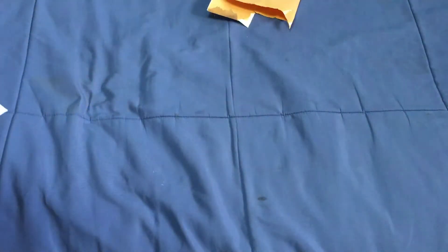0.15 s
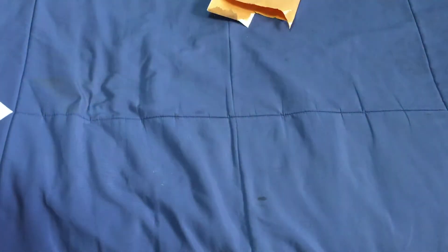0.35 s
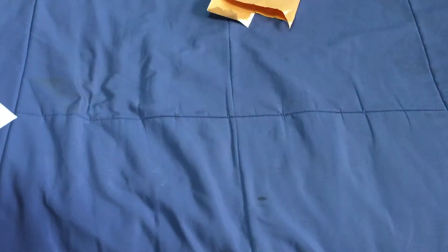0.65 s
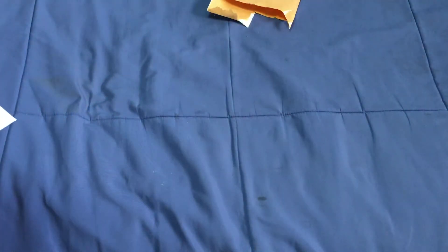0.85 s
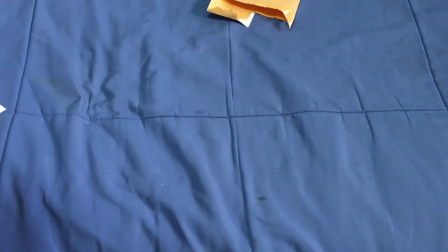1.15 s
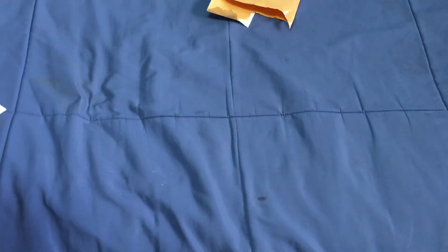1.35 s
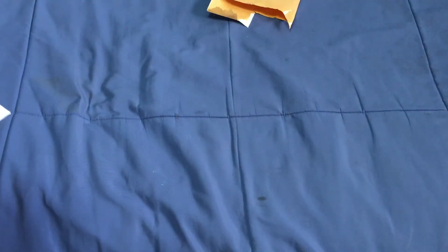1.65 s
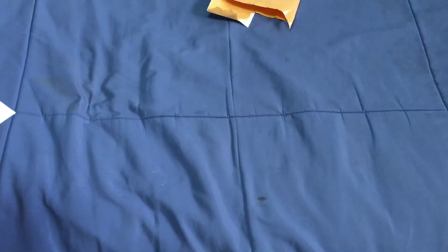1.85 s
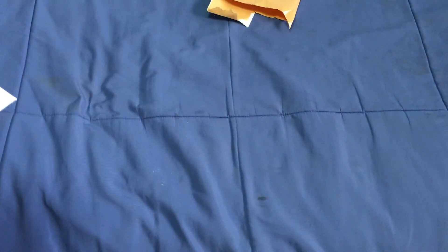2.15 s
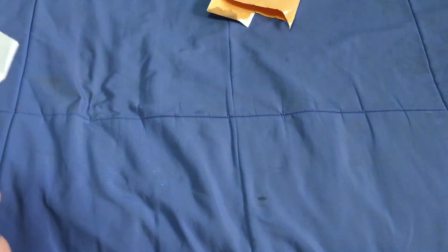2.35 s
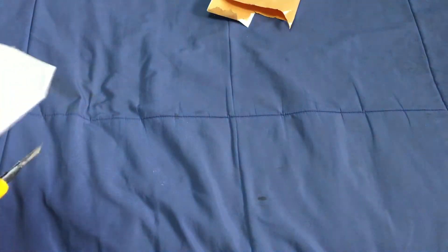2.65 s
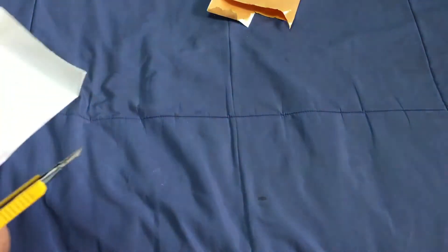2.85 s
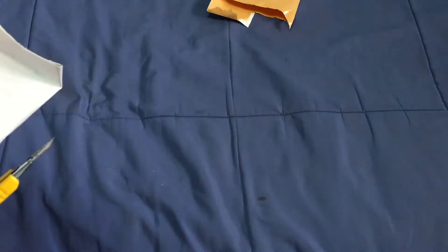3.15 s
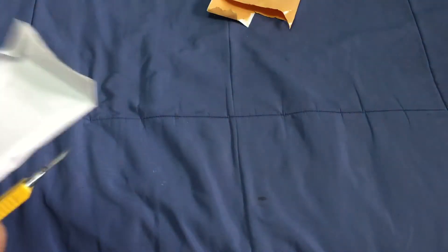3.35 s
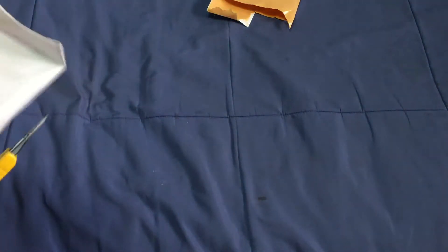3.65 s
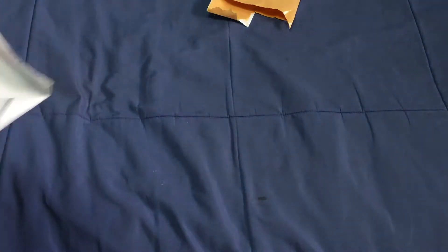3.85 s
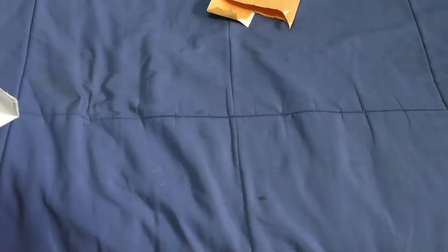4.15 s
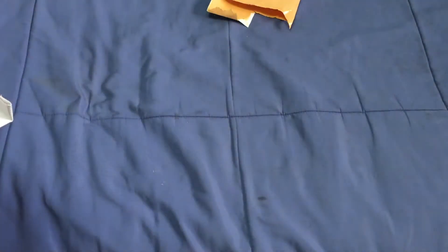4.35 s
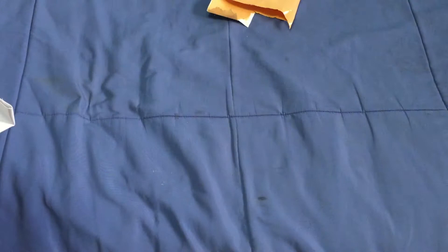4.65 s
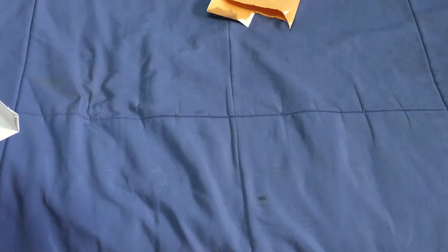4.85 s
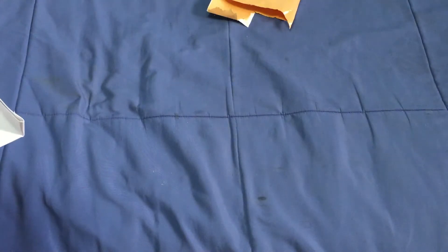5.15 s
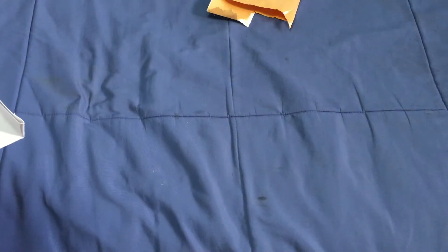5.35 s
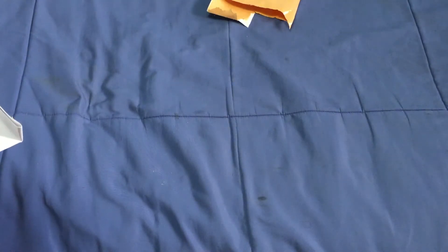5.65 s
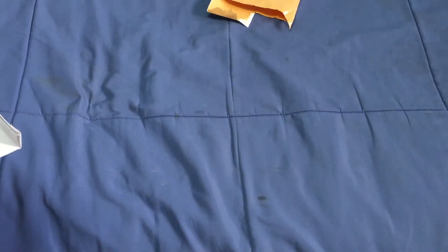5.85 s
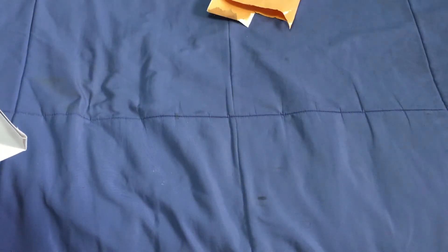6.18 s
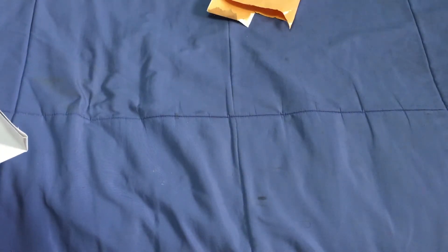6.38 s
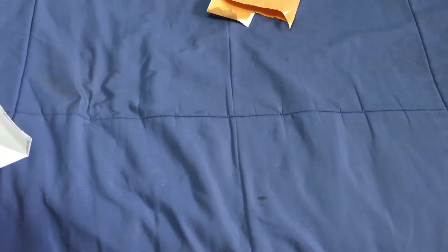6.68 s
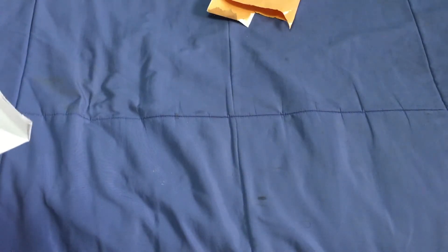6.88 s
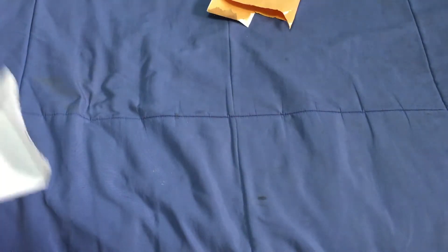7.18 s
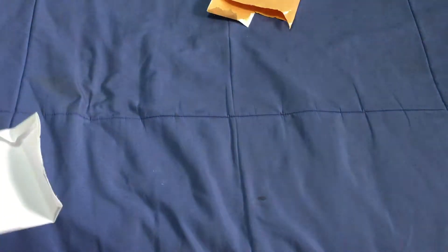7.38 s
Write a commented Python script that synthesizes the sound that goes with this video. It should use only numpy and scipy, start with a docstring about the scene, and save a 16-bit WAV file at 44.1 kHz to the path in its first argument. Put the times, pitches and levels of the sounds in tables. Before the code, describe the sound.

Stiff paper envelope handled and torn close up in a quiet room, with sharp crackling snaps, short rips and a brief pause before more crinkling.

```python
"""A small, quiet room: hands turn a stiff paper envelope close to the microphone and tear at its edge.
Strokes are filtered showers of fibre breaks over a rub; buckling creases are dispersed, scattered pulses.
The paper creaks once as a finger sticks and slips; the moving sheet pushes air in soft low thuds, swells of
filtered noise, and its panel thumps hollowly, some thumps under a loud snap.
A short decaying-noise tail and faint steady noise form the room; a microphone response colours the sum."""
import sys
import numpy as np
from scipy import signal
from scipy.fft import rfft, irfft
from scipy.io import wavfile
from scipy.ndimage import uniform_filter1d

SR = 44100
rng = np.random.default_rng(int(sys.argv[2]) if len(sys.argv) > 2 else 0)


def transcribe(u):
    """Save the signal u as a 16-bit wav file named by the first command-line argument.

    u: samples, shape (n,) or (channels, n), limited to [-1, 1]; the rate is SR.
    q: integer samples, one column per channel.
    """
    v = np.clip(np.atleast_2d(u).T, -1, 1)
    q = np.round(v * 32767).astype(np.int16)
    wavfile.write(sys.argv[1], SR, q)


N = 331496
TIME = np.arange(N) / SR  # s
HZ = np.arange(N // 2 + 1) * SR / N + 1  # offset by 1 Hz to keep logarithms finite

# Levels of all sources are those ahead of the microphone response.
# Spectrum of the quiet room: (frequency [Hz], relative spectral level [dB])
BACKGROUND_SPECTRUM = [(25, -17), (55, -1), (125, -2.5), (170, -13.5), (550, -25.5), (2400, -23),
                       (6500, -27), (15500, -33.5)]
BACKGROUND_DB = -71.2  # rms level

# Paper slides or tears:
# (time of full force [s], rise [s], fall [s], level at full force [dB],
#  lowest radiated frequency [Hz], panel resonance [Hz])
STROKES = [(0.008, 0.0084, 0.039, -60.5, 590, 1040), (1.081, 0.0045, 0.014, -36.5, 205, 1130),
           (1.11, 0.019, 0.48, -62.5, 270, 1007), (1.17, 0.019, 0.12, -57, 1160, 3900),
           (1.58, 0.18, 0.44, -57, 216, 1570), (1.658, 0.0092, .009, -35, 376, 2970),
           (1.686, 0.028, 0.081, -52, 690, 1454), (2.187, 0.0039, 0.02, -41, 329, 1130),
           (2.26, .045, 0.075, -37.5, 95.5, 1700), (2.299, 0.017, 0.011, -35, 508, 1600),
           (2.551, 0.0034, 0.0219, -33.5, 2100, 5420), (2.741, 0.016, 0.027, -38.5, 95.5, 1930),
           (2.89, 0.27, 0.16, -62, 706, 2120), (3.099, 0.036, 0.37, -65, 890, 2370),
           (3.273, 0.028, 0.057, -38.5, 643.6, 5300), (3.341, 0.059, 0.045, -37, 1100, 8090),
           (3.362, 0.0079, 0.021, -29.5, 596, 3152), (3.591, 0.0082, 0.003, -36, 754, 3520),
           (3.72, 0.017, 0.14, -57, 100, 2430), (3.825, 0.031, 0.17, -52, 1395, 2200),
           (4.046, 0.03, 0.018, -49.5, 2140, 4320), (4.181, 0.0042, 0.031, -60.5, 800, 1130),
           (4.418, 0.015, 0.052, -57, 1619, 1780), (4.451, 0.024, 0.027, -45, 1500, 5490),
           (4.728, 0.17, 0.15, -58.5, 3670, 4660), (5.361, 0.013, 0.023, -65.5, 1484, 2990),
           (5.8, 0.13, 0.27, -75.5, 1510, 2545), (6.355, 0.039, .06, -53.5, 546, 1860),
           (6.412, 0.016, 0.049, -46.5, 705, 2070), (6.499, 0.083, 0.17, -57, 120, 2440),
           (6.78, 0.12, 0.22, -60.5, 350, 2530), (6.85, 0.068, 0.032, -58, 1500, 5960),
           (7.215, 0.071, 0.094, -48.5, 564, 4400), (7.301, 0.15, 0.14, -65.5, 410, 2730),
           (7.475, 0.01, 0.011, -59.5, 101, 1760)]

# Treble slope of a stroke at the reference resonance and level, and its growth with each:
# small patches and hard strokes sound brighter
STROKE_HZ, STROKE_DB = 2000, -48
STROKE_SLOPE_DB = -1  # dB per octave
SLOPE_PER_OCTAVE, SLOPE_PER_DB = 3.1, 0.0757  # dB per octave, for each octave and each dB

# Fibre breaks per s in each sound path of a very small patch; one that rings at SPARSE_HZ has half
PATH_BREAKS_PER_S, SPARSE_HZ = 1450, 1560
RUB_SHARE = .35  # amplitude of the smooth rub against the rms of the breaks
# A tear advances in jerks, with a steady drag between them (energy against the mean of the jerks,
# for a very small patch)
JERKS_PER_S, JERK_S, JERK_SPREAD_DB, DRAG = 220, .0013, 3.7, .3
GLIDE_S = .09  # a stroke that takes longer than this to build up glides more than it jerks

# Reverberant tail: (frequency [Hz], t60 [s], level against the sound sent to the room [dB])
ROOM_BANDS = [(92, 0.25, 5), (218, 0.94, -23), (800, 0.32, -12.5), (1720, 0.25, -5.5), (4930, 0.22, -8),
              (15000, 0.15, -11.5)]

# Small creases: level at STROKE_DB, dB per dB of the stroke, random spread of level and of pitch
CRINKLE_DB, CRINKLE_FOLLOW, CRINKLE_SPREAD_DB, CRINKLE_OCTAVES = -49, .7, 2.5, 0.7

# A finger sticks and slips on the paper: (time [s], slip rate [1/s], level [dB])
CREAK = [(0.051, 227, -70), (0.064, 410, -66), (0.102, 184, -59), (0.123, 240, -57), (0.136, 500, -63),
         (0.142, 480, -81)]
# Resonances that each slip rings: (frequency [Hz], width [Hz], level [dB])
CREAK_MODES = [(3400, 500, 0), (1100, 900, -10), (6400, 1500, -17)]

# Creases buckle:
# (time [s], level [dB], lowest radiated frequency [Hz], panel resonance [Hz], treble slope [dB/octave])
SNAPS = [(0.482, -58, 500, 900, -5), (0.489, -38.5, 430, 1620, 5.5), (0.61, -49.5, 630, 3400, 1.5),
         (0.663, -53.5, 500, 5500, 5), (0.759, -40.5, 700, 3000, 3), (0.765, -42, 2300, 5500, 0),
         (0.902, -37, 1750, 1660, 4.0), (0.906, -37.5, 1750, 5000, 3), (1.005, -56.5, 490, 870, -4),
         (1.075, -24.5, 200, 1030, 0), (1.136, -38.5, 430, 4240, 1.5), (1.163, -45, 363, 3350, -4.5),
         (1.178, -45.5, 370, 4140, -11), (1.24, -37, 350, 4400, 3.0), (1.285, -49, 290, 3940, -3),
         (1.322, -46.5, 400, 3680, -4.5), (1.341, -51.5, 302, 3820, -6), (1.445, -29.5, 2395, 9040, 4),
         (1.597, -33.5, 200, 1063, -1), (1.607, -30, 1200, 6500, 8), (1.68, -37.0, 1312, 1830, -4.5),
         (1.762, -48, 380, 755, 0.5), (1.772, -47, 360, 3650, -9), (1.851, -42, 430, 4180, -5),
         (1.976, -24.5, 2000, 6800, 7), (2.061, -51, 630, 3327, -6.0), (2.123, -52, 2300, 3600, -5),
         (2.169, -39, 900, 5200, -8), (2.213, -35.5, 320, 1710, -5.5), (2.237, -32, 250, 1200, -7.5),
         (2.253, -17.5, 105, 950, -1.5), (2.327, -34, 530, 1960, -8.5), (2.498, -47, 1490, 3420, -11.5),
         (2.549, -26, 1820, 5940, 7), (2.571, -30, 1350, 2560, 2.5), (2.605, -37.5, 2420, 6530, 0.5),
         (2.739, -35.5, 110, 2140, -9), (2.918, -31, 570, 1700, -3), (3.056, -49, 400, 2570, -5),
         (3.259, -40.5, 1479, 4790, 2), (3.405, -29, 215.9, 5160, -3), (3.585, -38.5, 620, 1680, 1.5),
         (3.593, -33.5, 2300, 5500, 2), (3.794, -18.5, 1350, 2500, -8.5), (3.831, -39.5, 450, 640, 1),
         (3.921, -33.5, 2150, 5880, 3.5), (4.026, -44.5, 2640, 10400, -6), (4.044, -37, 2810, 3800, 3),
         (4.105, -45.5, 2800, 4410, 0.5), (4.196, -52, 580, 1270, -13.5), (4.279, -51.5, 231.7, 1690, -12),
         (4.349, -53.5, 2800, 9020, -16.0), (4.383, -48.0, 1610, 7080, -9), (4.423, -35, 2120, 1720, 1.5),
         (4.441, -41.5, 1420, 6370, -4.0), (4.471, -39, 3180, 4620, 2), (4.621, -34, 2400, 5000, 3),
         (4.658, -46, 2650, 4570, -1.5), (4.694, -42, 3180, 4180, -2), (4.725, -38, 3290, 4100, -0.5),
         (4.754, -35.5, 2996, 4340, -0.5), (4.845, -54, 1100, 1800, -7), (5.804, -55, 1300, 2700, -5.5),
         (5.916, -54.5, 2200, 5400, -4), (5.961, -23.5, 674, 1870, 1), (6.069, -44, 1330, 3500, -7.0),
         (6.0885, -36, 1360, 3500, 4), (6.0925, -39.5, 1445, 3520, -9.5), (6.448, -38, 1200, 9580, 2),
         (6.477, -31, 650, 2170, -0.5), (6.772, -34, 160, 2200, -0.5), (7.082, -44.5, 2000, 4500, 3),
         (7.104, -59, 700, 1600, -3.5), (7.229, -41.5, 2870, 6770, -3), (7.297, -54.5, 314, 2500, -3),
         (7.333, -50.5, 576, 1790, -4.5)]

# Soft low thuds as the moving sheet pushes air: (time [s], level at full swell [dB], centre frequency [Hz])
THUDS = [(1.075, -62, 94), (2.254, -52, 126), (2.744, -58.5, 79), (5.861, -67, 199), (6.074, -67, 165),
         (6.168, -72.5, 195.4)]

# Low hollow thumps of the envelope's panel, some under a loud snap: (time [s], level [dB])
THUMPS = [(3.183, -50.5), (3.205, -44.5), (3.407, -47), (3.795, -39)]
# The hollow body: lowest radiated Hz, resonance Hz, treble slope in dB per octave
BODY_LOW_HZ, BODY_HZ, BODY_SLOPE_DB = 139.2, 340, -10

# Microphone response: (frequency [Hz], gain [dB])
MICROPHONE = [(60, -10.5), (320, 9.5), (500, 9), (1500, 5.5), (3700, 3.5), (6200, 4.5), (8800, 1),
              (10200, -1), (11800, 0), (15500, -3)]
TOP_HZ = 15800  # upper edge of the passband


def undb(db):
    """Decibel law: twenty decibels are a factor of ten in amplitude."""
    return 10 ** (np.asarray(db) / 20)


def unit(x):
    """Normalisation: scale each row to an rms of one."""
    return x / np.sqrt(np.mean(np.abs(x) ** 2, axis=-1, keepdims=True) + 1e-20)


def add(out, s, x):
    """Superposition: mix the rows of x into out from time s on."""
    i = max(int(s * SR), 0)
    out[:, i:i + x.shape[1]] += x[:, :max(N - i, 0)]


def spectrum_hz(size):
    """Discrete spectrum: the frequencies of a block, offset by 1 Hz to avoid zero."""
    return np.arange(size // 2 + 1) * SR / size + 1


def colour(points):
    """Frequency response: gain at every frequency, interpolated in dB over log frequency."""
    hz, db = np.transpose(points)
    return undb(np.interp(np.log(HZ), np.log(hz), db))


def causal(gain):
    """Minimum phase: folding the cepstrum makes these gains respond as early as possible."""
    cepstrum = irfft(np.log(gain + 1e-7))
    half = len(cepstrum) // 2
    cepstrum[1:half] *= 2
    cepstrum[half + 1:] = 0
    return np.exp(rfft(cepstrum))


def background():
    """Stationary random noise: white noise shaped into the faint, steady spectrum of the room."""
    noise = rfft(rng.standard_normal(N))
    return undb(BACKGROUND_DB) * unit(irfft(noise * colour(BACKGROUND_SPECTRUM), N))


def panel(hz, low_hz, peak_hz, slope_db, near_db, ring_db,
          around_db=4.5, bump_octaves=0.23, ring_octaves=0.18, order=6):
    """Panel radiation: little bass, a broad resonance with a narrower ringing core, a sloping treble.
    Row 0 goes to the microphone; row 1 goes to the room, where all directions blur the resonance."""
    octaves = np.log2(hz / peak_hz)
    treble = undb(slope_db * np.maximum(octaves, 0))
    body = treble / np.sqrt(1 + (low_hz / hz) ** order)
    body = body * undb(ring_db / (1 + (octaves / ring_octaves) ** 2))
    bump = 1 / (1 + (octaves / bump_octaves) ** 2)
    # every new bend of the sheet has its own narrow modes, closest together at low pitch
    mode_hz, ripple_db = np.linspace(0, np.sqrt(SR / 2), 70) ** 2, 2.3
    modes = undb(ripple_db * np.interp(hz, mode_hz, rng.standard_normal(len(mode_hz))))
    near = body * undb(near_db * bump) * modes
    around = body * undb(around_db * bump)
    return np.array([causal(unit(near)), causal(unit(around))])


def shower(rate, spread_db, decay_s, size):
    """Shot process: random breaks of uneven strength free energy that dies away; its mean is one."""
    chance = rng.random(size)
    strength = np.minimum(rng.exponential(size=size), 3.5)
    breaks = (chance < rate / SR) * undb(spread_db * strength) ** 2
    energy = signal.lfilter([1], [1, -np.exp(-1 / (decay_s * SR))], breaks)
    return energy / energy.mean()


def strokes(spread_db=-0.5, scatter_s=0.00075, fold_octaves=.7, fold_db=-1, count=6, size=1024):
    """Friction and fracture: jerks carry showers of fibre breaks and a rub; each fold has its own pitch."""
    out, t = np.zeros((2, N)), TIME[:30000]
    hz = spectrum_hz(size)
    # the folds share the spectrum between them, from large and low to small and high
    centres = np.geomspace(500, 13000, count)[:, None]
    folds = np.exp(-(np.log2(hz / centres) / fold_octaves) ** 2) + .01
    folds = undb(fold_db) * folds / np.linalg.norm(folds, axis=0)
    # one further path: a torn fibre shakes all the folds at once
    paths = [causal(fold) for fold in folds] + [1]
    for top, rise, fall, db, low_hz, peak_hz in STROKES:
        size_slope_db = SLOPE_PER_OCTAVE * np.log2(peak_hz / STROKE_HZ)
        slope_db = STROKE_SLOPE_DB + size_slope_db + SLOPE_PER_DB * (db - STROKE_DB)
        sparseness = 1 + (SPARSE_HZ / peak_hz) ** 2
        force = np.interp(t, [0, rise, rise + fall], [0, 1, 0])
        # a large patch slides more smoothly than a small one, a gentle pull more than a sudden one
        steady = DRAG * sparseness ** 2 + (rise / GLIDE_S) ** 2
        jerks = np.sqrt(steady + shower(JERKS_PER_S, JERK_SPREAD_DB, JERK_S, size=len(t)))
        sheet = panel(hz, low_hz, peak_hz, slope_db, near_db=8, ring_db=-0.5)
        sound = 0
        for path in paths:
            energy = shower(PATH_BREAKS_PER_S / sparseness, spread_db, scatter_s, size=len(t))
            grain = rng.standard_normal(len(t)) * np.sqrt(energy + RUB_SHARE ** 2)
            fibres = grain * jerks * force
            sound = sound + signal.fftconvolve(fibres[None], irfft(sheet * path))[:, :len(t)]
        add(out, top - rise, undb(db) * unit(sound) * np.sqrt(np.mean(force ** 2)))
    return out


def room(x, first_s=0.00043, build_s=0.00037, boom_hz=320, boom_t60=0.54, boom_db=-13, size=32768):
    """Reverberation: dense noise decays at a rate set by frequency, beside one low room resonance."""
    t, tail = TIME[:size], 0
    log_hz = np.log(spectrum_hz(size))
    noise = rfft(rng.standard_normal(size))
    onset = 1 - np.exp(-np.maximum(t - first_s, 0) / build_s)
    centres = np.log(np.array(ROOM_BANDS)[:, 0])
    for share, (_, t60, db) in zip(np.eye(len(ROOM_BANDS)), ROOM_BANDS):
        fade = onset * np.exp(-np.log(1000) * t / t60)
        band = irfft(noise * np.interp(log_hz, centres, share))
        tail = tail + undb(db) * band * fade / np.linalg.norm(fade)
    ring = np.exp(-np.log(1000) * t / boom_t60)
    boom = undb(boom_db) * 2 * ring / ring.sum() * np.sin(2 * np.pi * boom_hz * t)
    return signal.fftconvolve(x, tail + boom)[:N]


def crinkles(peak_hz=3000, slope_db=-4, count=70):
    """Random buckling: small creases give while the paper moves; longer strokes shed more of them."""
    top, rise, fall, db, low_hz, _ = np.transpose(STROKES)
    share = np.cumsum(rise + fall) / np.sum(rise + fall)
    rows = []
    for k in np.searchsorted(share, (np.arange(count) + .5) / count):
        s = top[k] + rng.triangular(-rise[k], 0, fall[k])
        strength, pitch = rng.standard_normal(2)
        level_db = CRINKLE_DB + CRINKLE_FOLLOW * (db[k] - STROKE_DB) + CRINKLE_SPREAD_DB * strength
        rows.append((s, level_db, low_hz[k], peak_hz * 2 ** (CRINKLE_OCTAVES * pitch), slope_db))
    return rows


def creak(uneven=0.1):
    """Stick-slip friction: a short run of nearly regular slips, each ringing the taut paper."""
    s, rate, db = np.transpose(CREAK)
    wander = 1 + uneven * unit(uniform_filter1d(rng.standard_normal(N), SR // 200))
    cycles = np.cumsum(np.interp(TIME, s, rate) * wander) / SR
    slips = np.diff(np.floor(cycles), prepend=0)
    body = sum(undb(g) / (1 + 1j * (HZ ** 2 - f ** 2) / (HZ * width)) for f, width, g in CREAK_MODES)
    level = np.interp(TIME, s, undb(db), 0, 0)
    return unit(irfft(rfft(slips) * body, N)) * level


def snaps(rows, scatter_hz=700, scatter_s=0.00074, bend_s=0.000893, give_db=-25, flip_db=-17, size=2048):
    """Dispersion and scattering: each buckle is a pulse that spreads in the sheet and off its folds."""
    lead_s = .008  # room ahead of the pulse
    span = .002 * SR  # samples over which the level counts
    out, t = np.zeros((2, N)), np.arange(size) / SR - lead_s
    hz = spectrum_hz(size)
    # bending waves are slower at low pitch, so the bass leaves last; the delay is bend_s at 800 Hz
    bending = np.exp(-2j * np.pi * (hz * lead_s + 2 * bend_s * np.sqrt((hz + 200) * 1000)))
    # the fold gives a little before it buckles, then waves bounce between its edges
    age = np.maximum(t, 0) / scatter_s
    bouncing = age * np.exp(1 - age) + undb(give_db) * np.exp(-np.abs(t) / 0.0045)
    for s, db, low_hz, peak_hz, slope_db in rows:
        echoes = unit(rfft(rng.standard_normal(size) * bouncing))
        # short waves scatter most; a hard buckle flips the whole panel at once, in one clean pop
        scatter = np.sqrt(hz / scatter_hz) / (1 + undb(db - flip_db) ** 2)
        near = (bending + scatter * echoes) / np.sqrt(1 + scatter ** 2)
        # the room collects all directions, which evens out the colour of the scattering
        sheet = panel(hz, low_hz, peak_hz, slope_db, near_db=8.0, ring_db=2.5)
        snap = irfft(np.array([near, bending]) * sheet)
        # start 1 ms early to offset the bending delay
        add(out, s - lead_s - .001, undb(db) * unit(snap) * np.sqrt(span / size))
    return out


def thuds(swell_s=0.0068, octaves=0.53, size=8192):
    """Air displacement: the moving sheet pushes air in a brief swell of noise around one low pitch."""
    out, age = np.zeros((2, N)), TIME[:size] / swell_s
    hz = spectrum_hz(size)
    swell = age * np.exp(1 - age)
    for s, db, centre_hz in THUDS:
        body = causal(1 / (1 + (np.log2(hz / centre_hz) / octaves) ** 4))
        thud = unit(irfft(rfft(rng.standard_normal(size) * swell) * body))
        add(out, s, undb(db) * thud[None] * np.sqrt(np.mean(swell ** 2)))
    return out


def thumps():
    """Body resonance: every thump is a pulse with the same hollow resonance and falling treble."""
    return [(s, db, BODY_LOW_HZ, BODY_HZ, BODY_SLOPE_DB) for s, db in THUMPS]


def scene():
    """Superposition: the direct sound of the paper, its room tail and the background."""
    near, around = strokes() + snaps(crinkles()) + creak() + snaps(SNAPS + thumps()) + thuds()
    return (near + room(around) + background())[None]


def record(dry):
    """Linear filtering: a small microphone colours the sound; an elliptic low-pass cuts the top steeply."""
    heard = irfft(rfft(dry) * causal(colour(MICROPHONE)), N)
    return signal.sosfilt(signal.ellip(10, .2, 70, TOP_HZ, fs=SR, output="sos"), heard)


dry = scene()
out = record(dry)
transcribe(out)
```